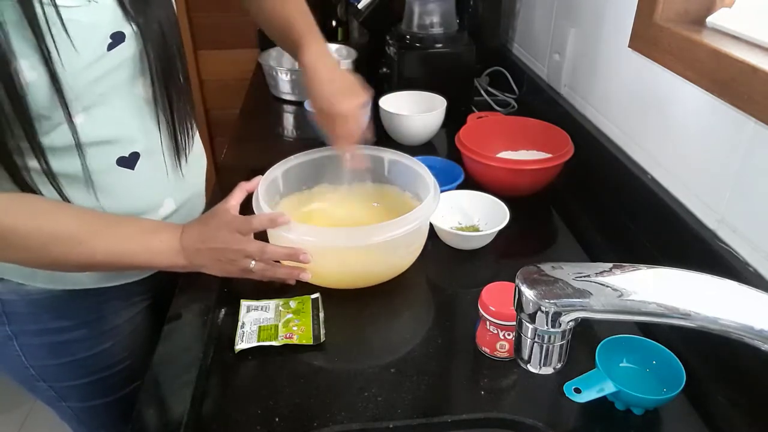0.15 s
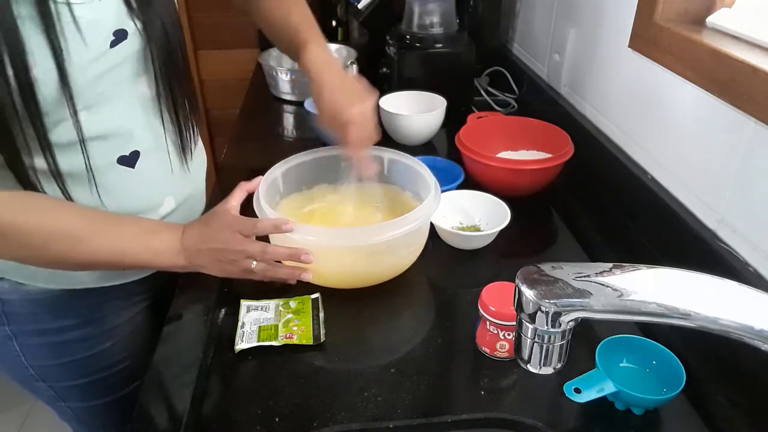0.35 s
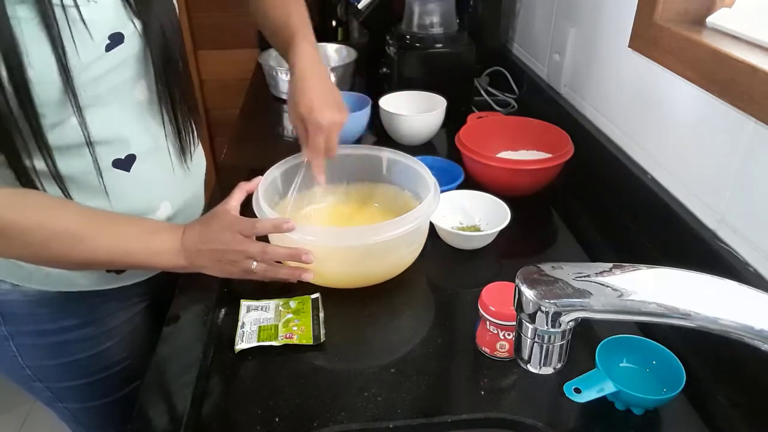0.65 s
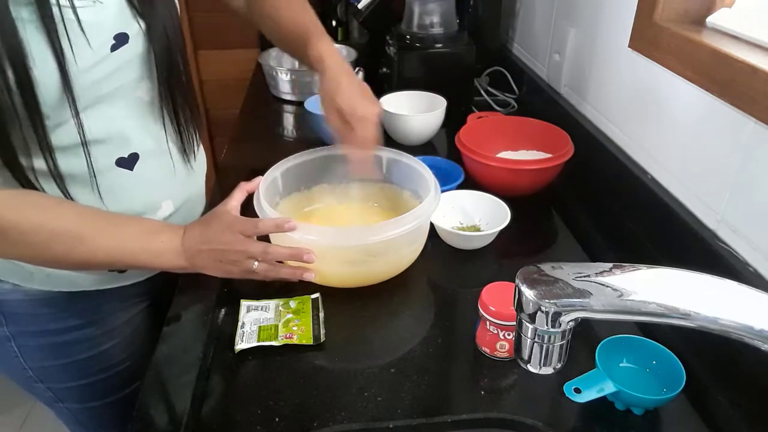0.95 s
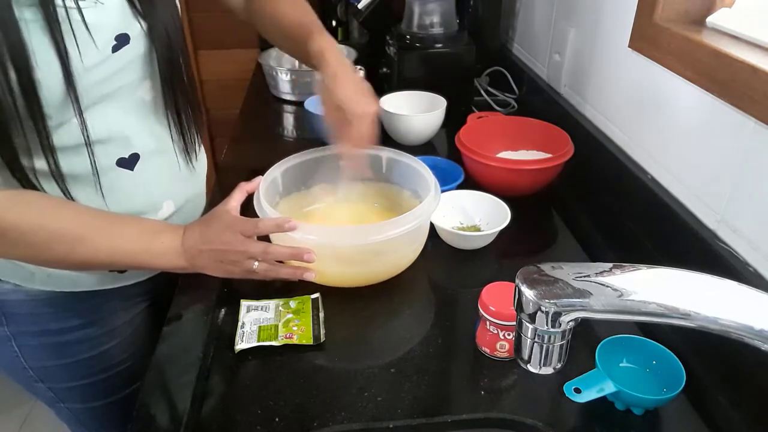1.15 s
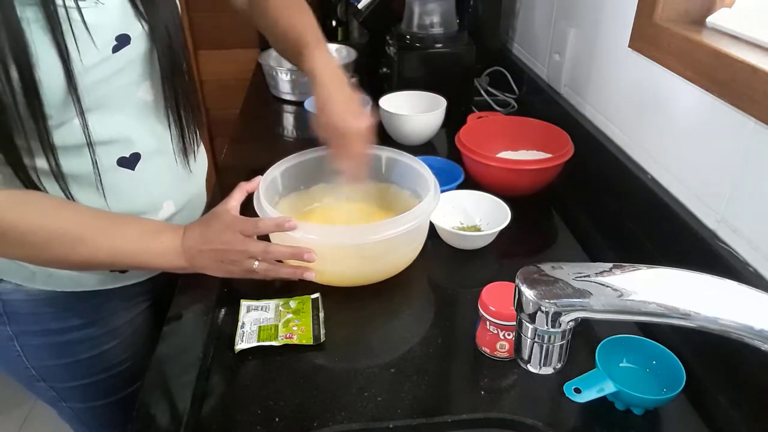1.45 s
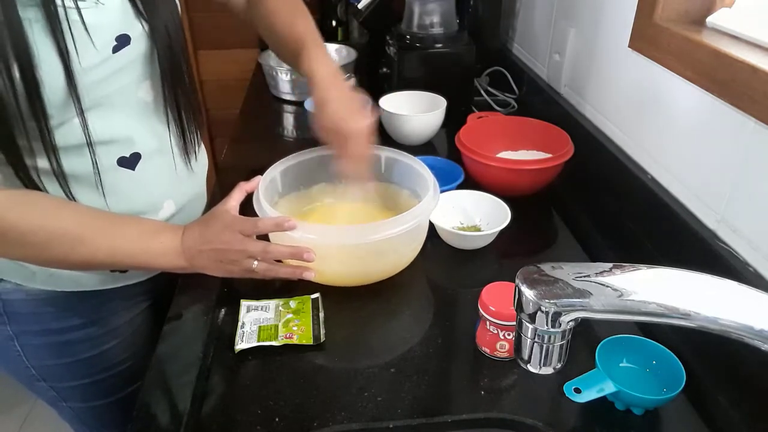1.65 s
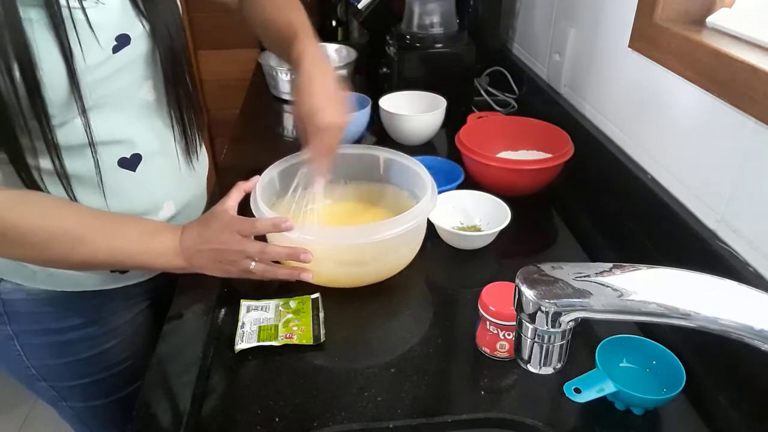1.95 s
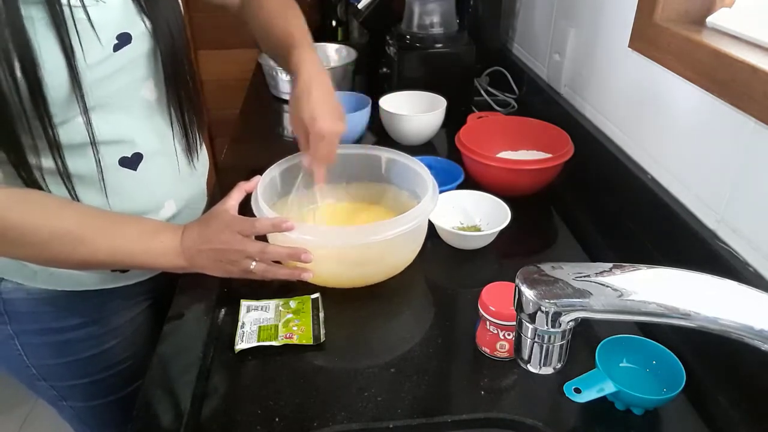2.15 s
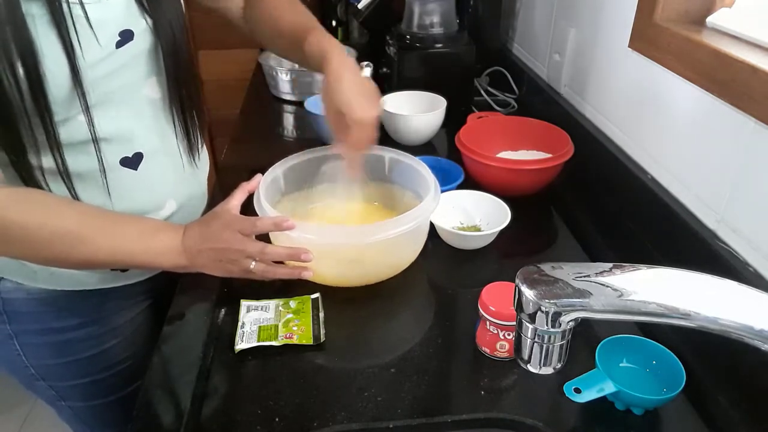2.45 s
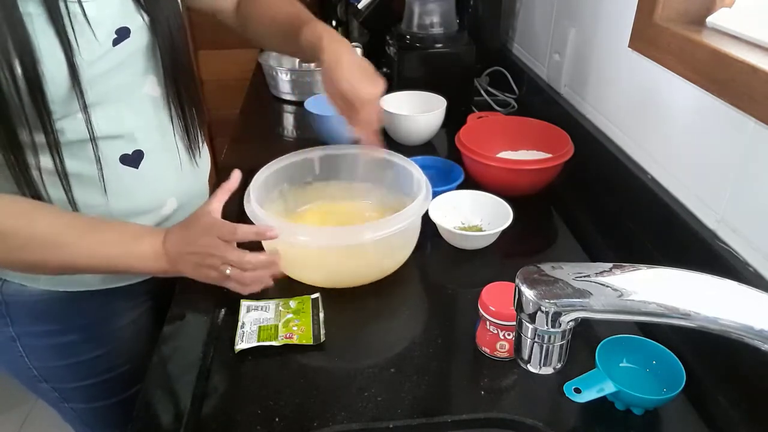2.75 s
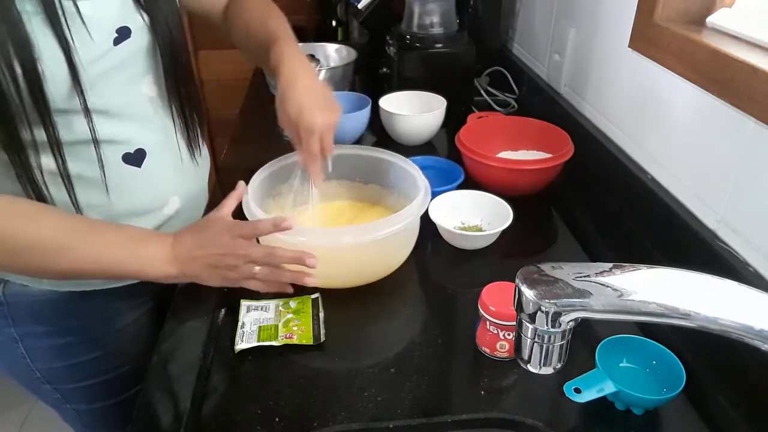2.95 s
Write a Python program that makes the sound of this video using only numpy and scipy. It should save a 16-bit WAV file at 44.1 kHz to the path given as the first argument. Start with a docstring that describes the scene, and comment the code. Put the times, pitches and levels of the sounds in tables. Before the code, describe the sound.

A wire whisk beats batter in a plastic bowl with rapid, even clicking strokes.

```python
"""A kitchen counter, one microphone near a plastic bowl: a wire whisk beats batter at nearly five
strokes a second. Each stroke plunges in with a hollow plop of trapped air, thuds, scrapes through the
batter and clatters against the wall, where slipping wires chirp. After a short break the whisk knocks
the bowl once more. Behind it the hard room rings after every stroke, with a faint low boom."""
import sys
import numpy as np
from scipy import signal
from scipy.fft import rfft, irfft, next_fast_len
from scipy.io import wavfile

SR = 44100
rng = np.random.default_rng(int(sys.argv[2]) if len(sys.argv) > 2 else 0)


def store_wav(level_fs):
    """Save 16-bit WAV to argv[1]."""
    pcm = np.round(np.clip(np.atleast_2d(level_fs), -1, 1) * 32767)
    wavfile.write(sys.argv[1], SR, pcm.T.astype(np.int16))


N = 136710
T = np.arange(N) / SR


def from_db(db):
    """Decibels to gain."""
    return 10 ** (np.asarray(db) / 20)


def rms_one(x):
    """Scale to an rms of 1."""
    return x / np.sqrt(np.mean(x ** 2) + 1e-20)


def at_hz(points, hz):
    """Read a table on a log-frequency axis."""
    freqs, values = np.transpose(points)
    return np.interp(np.log(np.maximum(hz, 1)), np.log(freqs), values)


def lag(x, seconds):
    """One-pole smoothing."""
    pole = np.exp(-1 / (seconds * SR))
    return signal.lfilter([1 - pole], [1, -pole], x)


def colour(x, spectrum):
    """Minimum-phase filter of unit power gain: only the shape of the spectrum counts."""
    size = 2 * next_fast_len(N)
    gain = rms_one(from_db(at_hz(spectrum, np.arange(size // 2 + 1) * SR / size)))
    cepstrum = irfft(np.log(gain))
    cepstrum[1:size // 2] *= 2
    cepstrum[size // 2 + 1:] = 0
    return irfft(rfft(x, size) * np.exp(rfft(cepstrum)))[:N]


def ring(x, modes):
    """Drive a set of decaying modes of alternating sign."""
    out = np.zeros(N)
    for k, (hz, db, t60) in enumerate(modes):
        radius, angle = np.exp(-np.log(1000) / (t60 * SR)), 2 * np.pi * hz / SR
        mode = signal.lfilter([0, np.sin(angle)], [1, -2 * radius * np.cos(angle), radius ** 2], x + 1e-18)
        out += (-1) ** k * from_db(db) * mode
    return out


def envelope(start_s, rise_s, hold_s, fade_s):
    """Linear rise, full level until hold_s after the start, exponential fade."""
    t = T - start_s
    return np.clip(t / rise_s, 0, 1) * np.exp(-np.clip((t - hold_s) / fade_s, 0, 20))


def contacts(env, per_s=3800, spread_db=4.5):
    """Wire contacts: random clicks of uneven size, carrying the energy of the envelope."""
    clicks = (rng.random(N) < per_s / SR) * rng.choice([-1, 1], N)
    sizes = from_db(spread_db * np.clip(rng.standard_normal(N), -2, 2))
    return rms_one(env * clicks * sizes) * np.sqrt(np.mean(env ** 2))


# Room tone all around the microphone: freq_hz, relative_db
AIR_SPECTRUM = [(20, 12), (60, -10), (115, 8), (250, -5), (700, 1), (2000, -4.5), (8000, -16), (15000, -47)]

def room_air():
    """Still kitchen air: faint, steady, dark noise."""
    return from_db(-48) * colour(rng.standard_normal(N), AIR_SPECTRUM)


# How long the kitchen rings: freq_hz, t60_s
ROOM_DECAY = [(100, 0.35), (400, 0.33), (1500, 0.32), (4000, 0.36), (8000, 0.33), (15000, .30)]
# Colour of the sound coming back from the walls: freq_hz, relative_db
ROOM_SPECTRUM = [(100, -3), (400, -0.5), (1500, -2), (4000, -2.5), (8000, -4), (15000, -3)]

def kitchen(x, echo_onset_s=0.0064, wash_onset_s=0.00082):
    """Hard walls return dense echoes and a diffuse wash, dying band by band; one low mode lingers."""
    t, tail, wash = T[:SR // 2], 0, 0
    white, walls = rng.standard_normal((2, N)), rng.standard_normal((2, len(t)))
    onset = np.minimum(t / echo_onset_s, 1) ** 2
    edges_hz = np.geomspace(400, 17300, 25) - 300
    for k, (low, high) in enumerate(zip(edges_hz, edges_hz[1:])):
        hz = np.sqrt(low * high)
        band = signal.butter(2, [low, high], "band", fs=SR, output="sos")
        gain = from_db(at_hz(ROOM_SPECTRUM, hz))
        decay_s = at_hz(ROOM_DECAY, hz) / np.log(1000)
        echoes = signal.sosfilt(band, walls[k % 2]) * onset * np.exp(-t / decay_s)
        tail += gain * echoes * np.sqrt(2 * (high - low) / SR / np.sum(echoes ** 2))
        # the wash is noise that follows the energy lingering in the band
        power = signal.sosfilt(band, x + 1e-12 * white[0]) ** 2
        energy = lag(lag(power, wash_onset_s), decay_s / 2)
        wash += gain * np.sqrt(energy) * rms_one(signal.sosfilt(band, white[k % 2]))
    reflections = signal.fftconvolve(x, tail)[:N]
    boom = ring(x, [(118.5, 0, 0.7)])   # pitch_hz, gain_db, t60_s
    return from_db(-2.5) * reflections + from_db(-4) * wash + from_db(-49) * boom


# Wires slipping on the bowl wall: start_s, pitch_hz, level_db
WIRE_SLIPS = [(0.246, 2700, -24), (0.465, 2500, -28.5), (0.682, 2350, -24), (0.898, 1770, -26),
              (1.100, 2430, -19.5), (1.310, 2420, -22.5), (1.527, 2130, -29), (1.73, 2170, -18.5),
              (1.943, 2220, -24), (2.169, 2350, -24), (2.384, 2260, -21), (2.62, 1950, -24)]

def chirps(width_hz=400):
    """Wires slide on the plastic in short, rough notes of narrow-band noise."""
    out = np.zeros(N)
    t60_s = np.log(1000) / (np.pi * width_hz)
    for start_s, pitch_hz, level_db in WIRE_SLIPS:
        note = ring(rng.standard_normal(N), [(pitch_hz, 0, t60_s)])
        env = envelope(start_s, rise_s=0.0023, hold_s=0.007, fade_s=0.0034)
        out += from_db(level_db) * rms_one(note * env) * np.sqrt(np.mean(env ** 2))
    return out


# The plastic wall, struck hard: freq_hz, relative_db
KNOCK_SPECTRUM = [(60, -50), (300, -27), (1100, -15), (1450, -6), (1720, 1), (2000, -2), (2300, 0),
                  (2700, -11), (4200, -13.5), (6000, -45)]

def knock():
    """One last hard blow with a short rattle makes the plastic wall clack."""
    blow = envelope(start_s=2.8255, rise_s=0.00061, hold_s=0.0073, fade_s=0.0075)
    return from_db(-12) * colour(contacts(blow), KNOCK_SPECTRUM)


def plop(start_s, pitch_hz, hold_s=0.016, glide_per_s=1.7):
    """A plunge traps an air pocket that sounds briefly, rising through pitch_hz."""
    glide = 1 + glide_per_s * np.clip(T - start_s - hold_s, -hold_s, hold_s)
    tone = np.sin(2 * np.pi * np.cumsum(pitch_hz * glide * (T >= start_s)) / SR)
    return envelope(start_s, rise_s=0.0057, hold_s=hold_s, fade_s=0.004) * tone


# Dull thud of the full bowl: freq_hz, relative_db
THUD_SPECTRUM = [(55, -31), (110, -15), (210, -1), (290, -5), (420, -4), (700, -9), (1200, -11),
                 (3000, -37.5)]
# Resonances of the bowl of batter: pitch_hz, gain_db, t60_s
BOWL_RESONANCES = [(221, -1, 0.22), (323, -8, 0.19), (437, 8, 0.25), (530, 1, 0.25), (689, -1, 0.63)]
# Wet crackle as the wires part the batter: freq_hz, relative_db
DRAG_SPECTRUM = [(50, -10), (120, -15), (400, 5), (900, 0), (2000, 0), (5500, -3), (8300, 2), (10000, -19),
                 (15000, -10)]
# Plunges into the batter: start_s, plop_db, pitch_hz, thud_db, drag_s, drag_db
WHISK_STROKES = [(0.149, -24, 394, -28.5, 0.13, -35.5), (0.381, -26, 406, -21, 0.083, -33.5),
                 (0.609, -22.5, 399, -22, 0.081, -31.5), (0.822, -15.5, 458.6, -21, 0.065, -33.5),
                 (1.035, -18, 466, -23, 0.064, -32), (1.247, -15, 450, -24, 0.089, -30.5),
                 (1.456, -14, 438, -22, 0.093, -29.5), (1.67, -25.5, 444, -25.5, 0.047, -27.5),
                 (1.868, -25.5, 437, -22.5, 0.12, -31), (2.089, -40, 513, -22.5, 0.11, -29.5),
                 (2.312, -19, 530, -26, 0.1, -30.5), (2.506, -31, 476, -25, 0.076, -32.5),
                 (2.826, -38, 500, -29, .16, -33)]

def strokes():
    """The whisk plops in, thuds the bowl and drags through the batter; returns (bowl, plops)."""
    plops, thuds, drags = np.zeros((3, N))
    for start_s, plop_db, pitch_hz, thud_db, drag_s, drag_db in WHISK_STROKES:
        plops += from_db(plop_db) * plop(start_s, pitch_hz)
        plunge = envelope(start_s, rise_s=0.0024, hold_s=0.015, fade_s=0.011)
        thuds += from_db(thud_db) * contacts(plunge)
        sweep = envelope(start_s, rise_s=0.044, hold_s=drag_s, fade_s=0.0073)
        drags += from_db(drag_db) * contacts(sweep, per_s=900)
    body = from_db(-1) * colour(thuds, THUD_SPECTRUM) + from_db(-45.5) * ring(thuds, BOWL_RESONANCES)
    scrape = from_db(2) * colour(drags, DRAG_SPECTRUM)
    return body + scrape, from_db(2.5) * plops


# Bright tick of the wires: freq_hz, relative_db
TICK_SPECTRUM = [(60, -71), (300, -48.5), (1500, -8.5), (3000, -7), (4500, 0.5), (5800, -4.5), (7000, -0.5),
                 (8400, 1.5), (10000, -19.5), (12000, -16.5), (14000, -11), (16000, -16)]
# Clack of the plastic: freq_hz, relative_db
CLACK_SPECTRUM = [(60, -40.5), (150, -13.5), (400, -6.5), (650, -0.5), (900, -6), (1200, -0.5),
                  (2200, -1.5), (3200, -5), (5000, -15), (10000, -31.5)]
# Resonances of the whisk: pitch_hz, gain_db, t60_s
WHISK_RESONANCES = [(1216.7, 1, 0.25), (1360, -26, 0.056), (1695, -33.5, 0.27), (1712, -0.5, 0.34),
                    (1837, -5, 0.05), (2008, 3, 0.027), (2310, -4.5, 0.022), (2336, 12.5, 0.044),
                    (2560, -41.5, .05)]
# Wires hitting the wall, in the foreground: start_s, tick_db, clack_db, rise_s, hold_s
WALL_HITS = [(0.000, -38, -30, 0.00067, 0.02), (0.116, -48, -47, .001, .003),
             (0.150, -33.5, -26, 0.00074, 0.0069), (0.238, -20, -23, 0.0075, 0.018),
             (0.383, -27, -25.5, 0.0012, 0.0075), (0.458, -21.5, -27, 0.00088, 0.0025),
             (0.466, -26, -21.5, .003, .008), (0.611, -28, -30.5, 0.0013, 0.0081),
             (0.675, -20.5, -27.5, 0.0012, 0.0019), (0.686, -22, -21.5, 0.0027, 0.0063),
             (0.823, -23, -26.5, 0.002, 0.0027), (0.831, -22.5, -21, 0.0012, 0.0034),
             (0.891, -15.5, -34, 0.0013, 0.0033), (0.898, -22.5, -19.5, 0.0038, 0.0053),
             (1.037, -30, -20.5, 0.00064, 0.01), (1.046, -23, -35, 0.0012, 0.003),
             (1.088, -22, -30, 0.0053, 0.0055), (1.098, -15, -21.5, 0.0026, 0.0053),
             (1.233, -41, -30, .001, 0.012), (1.25, -22, -23, 0.00092, .003),
             (1.256, -17, -19, 0.00052, .004), (1.308, -18, -17.5, 0.00079, 0.0064),
             (1.442, -42, -31, 0.0017, .006), (1.457, -18, -19.5, 0.0023, 0.0092),
             (1.527, -18.5, -20, .002, 0.0056), (1.674, -25, -23, 0.0024, 0.0073),
             (1.728, -16, -18, 0.0033, 0.0048), (1.737, -24, -21.5, 0.0028, .006),
             (1.862, -47, -27, .001, 0.0065), (1.869, -19, -22, 0.0022, 0.011),
             (1.886, -19, -19.5, 0.0018, 0.0056), (1.944, -19, -25.5, .003, 0.0082),
             (1.967, -27, -23.5, 0.00099, 0.0039), (2.084, -15, -13.5, 0.0028, 0.0047),
             (2.099, -15.5, -12.5, 0.00077, 0.0035), (2.153, -26, -36, 0.0034, 0.0059),
             (2.168, -21, -19.5, 0.0033, 0.0063), (2.29, -33, -24.5, .001, 0.018),
             (2.315, -20.5, -20, 0.0025, 0.0061), (2.382, -16.5, -24, 0.0094, 0.0078),
             (2.506, -27, -26, 0.0009, 0.0043), (2.555, -21, -19.5, 0.009, 0.011),
             (2.603, -22.5, -26, .008, 0.014), (2.621, -24, -20, 0.0045, 0.0097),
             (2.827, -20.5, -19.5, 0.00043, .006), (2.844, -29, -22.5, 0.0012, 0.0018),
             (2.884, -30.5, -25, 0.0013, 0.018), (2.983, -29, -32, 0.0018, 0.011)]

def clatters():
    """The wires hit the bowl in quick succession: bright ticks, a plastic clack and a faint ring."""
    ticks, clacks = np.zeros((2, N))
    for start_s, tick_db, clack_db, rise_s, hold_s in WALL_HITS:
        env = envelope(start_s, rise_s, hold_s, fade_s=0.0063)
        ticks += from_db(tick_db) * contacts(env)
        clacks += from_db(clack_db) * contacts(env)
    wires = from_db(0.5) * colour(ticks, TICK_SPECTRUM)
    plastic = from_db(1) * colour(clacks, CLACK_SPECTRUM)
    return wires + plastic + from_db(-39.5) * ring(clacks, WHISK_RESONANCES)


def scene():
    """At the counter, in mono: whisk and bowl in front, the kitchen behind."""
    wires = clatters() + chirps()
    bowl, plops = strokes()
    whisking = wires + bowl + knock()
    room = kitchen(whisking + from_db(-6) * plops)   # plops sound deep in the bowl and reach the room less
    return (from_db(-2.5) * (whisking + plops + room) + room_air())[None]


def record(dry, low_cut_hz=78, high_cut_hz=15800, ceiling=0.8):
    """The microphone drops the deep bass, peaks are rounded and the top is cut."""
    low_cut = signal.butter(2, low_cut_hz, "high", fs=SR, output="sos")
    high_cut = signal.ellip(10, 0.1, 80, high_cut_hz, fs=SR, output="sos")
    rounded = ceiling * np.tanh(signal.sosfilt(low_cut, dry) / ceiling)
    return signal.sosfilt(high_cut, rounded)


dry = scene()
out = record(dry)
store_wav(out)
```